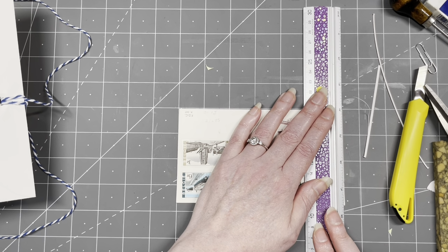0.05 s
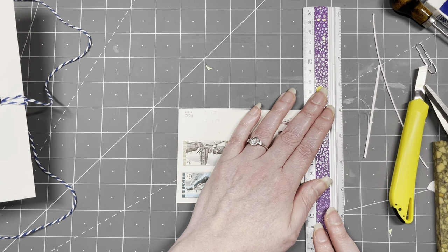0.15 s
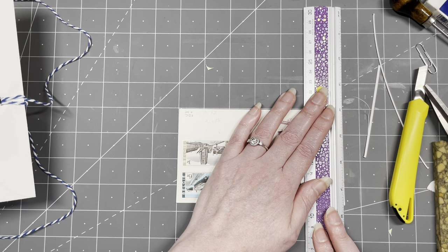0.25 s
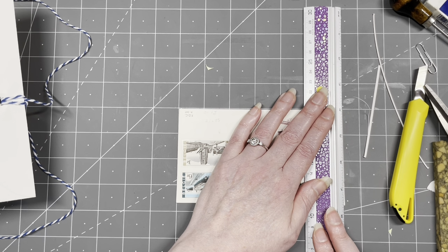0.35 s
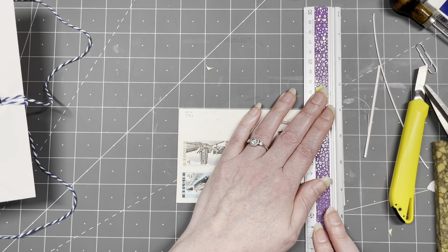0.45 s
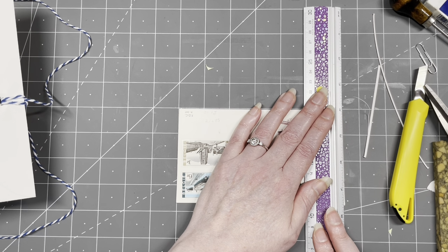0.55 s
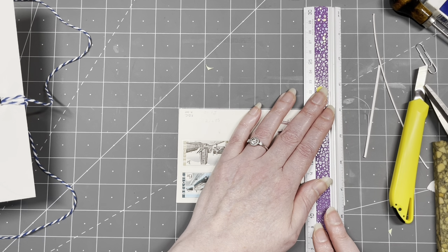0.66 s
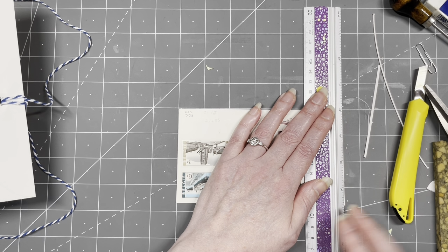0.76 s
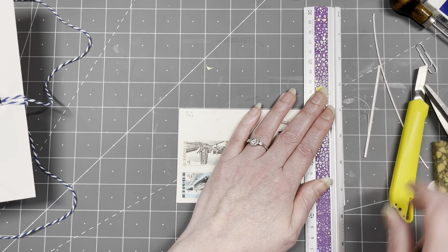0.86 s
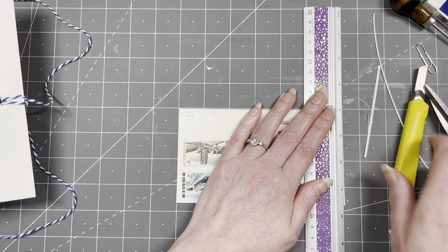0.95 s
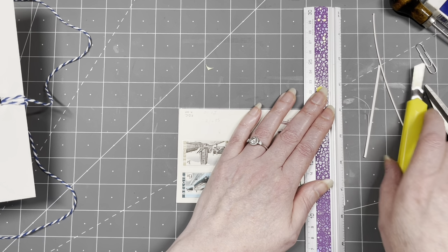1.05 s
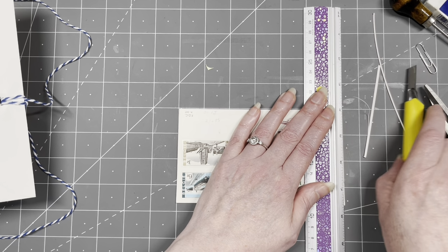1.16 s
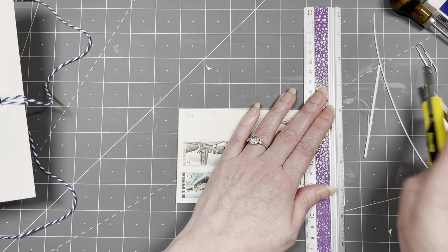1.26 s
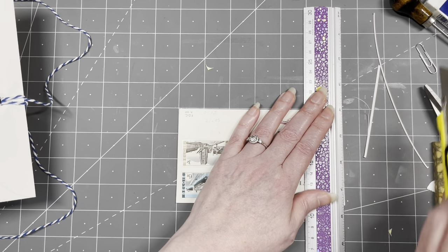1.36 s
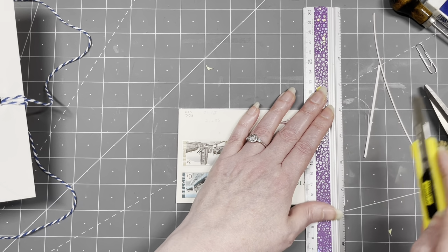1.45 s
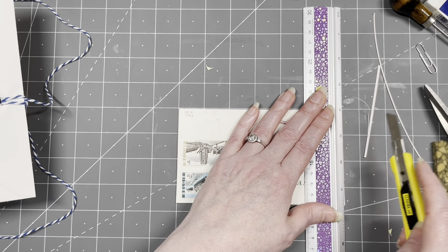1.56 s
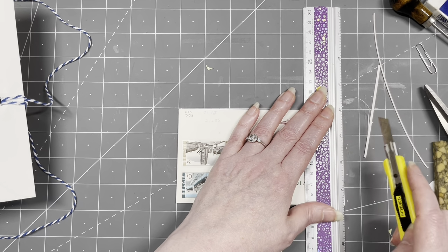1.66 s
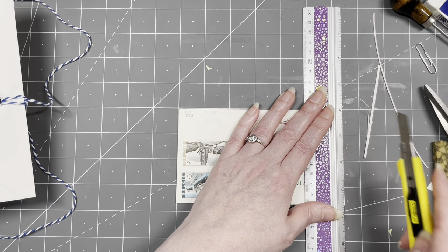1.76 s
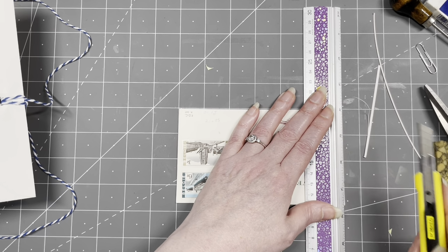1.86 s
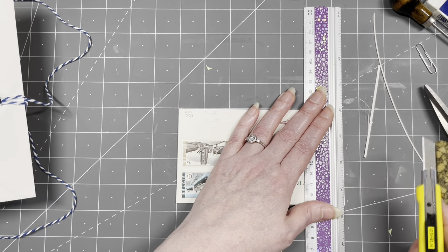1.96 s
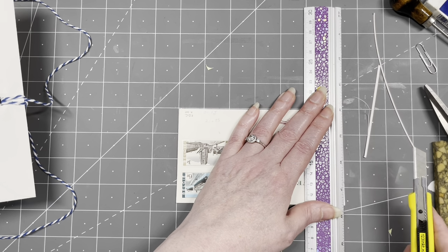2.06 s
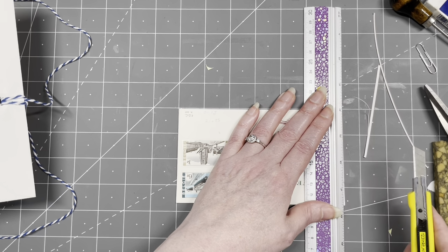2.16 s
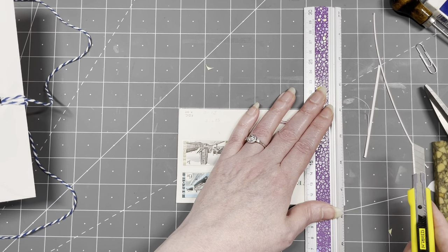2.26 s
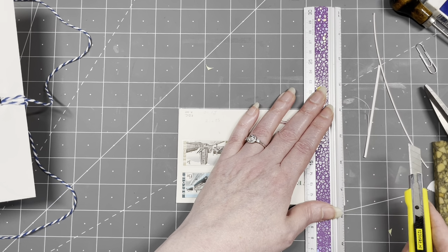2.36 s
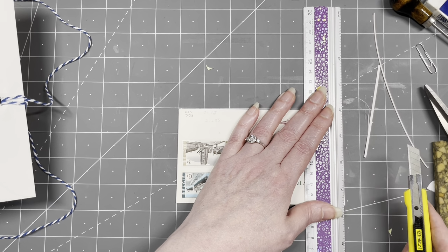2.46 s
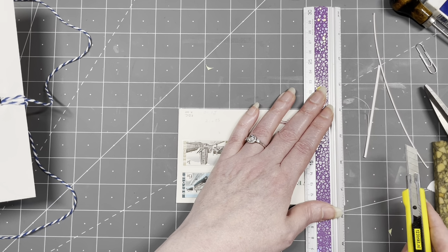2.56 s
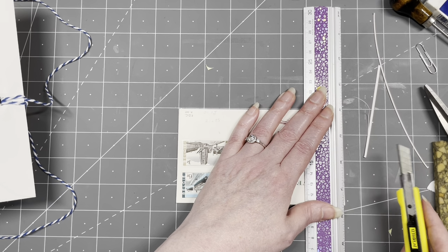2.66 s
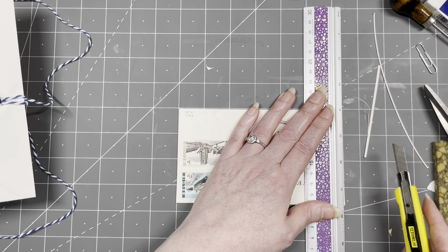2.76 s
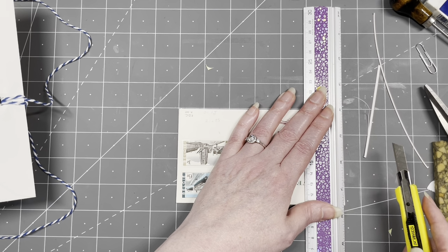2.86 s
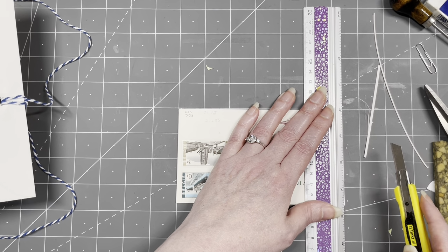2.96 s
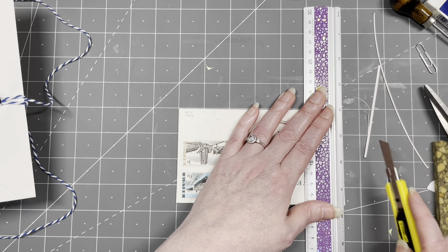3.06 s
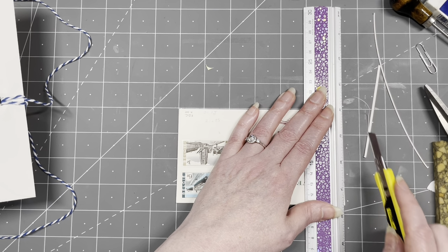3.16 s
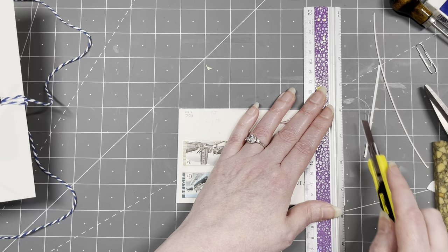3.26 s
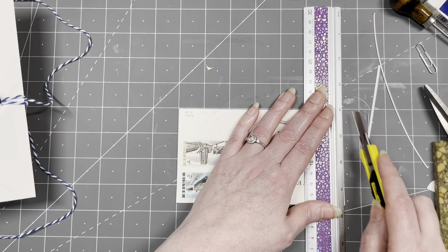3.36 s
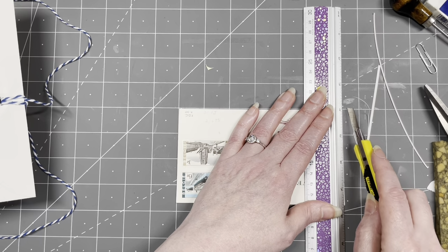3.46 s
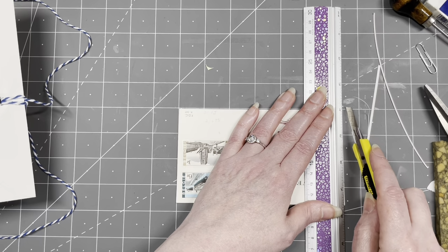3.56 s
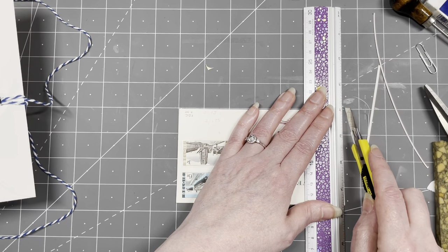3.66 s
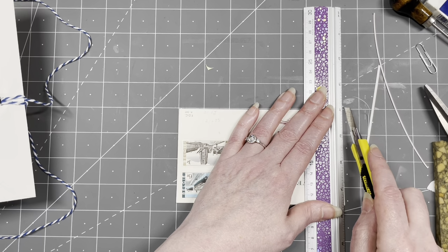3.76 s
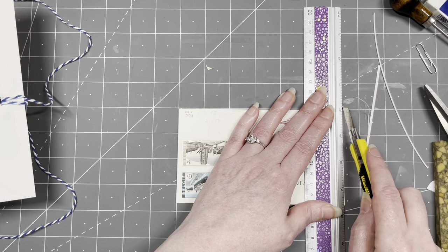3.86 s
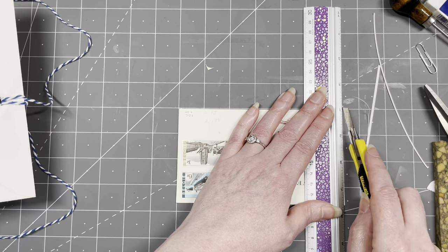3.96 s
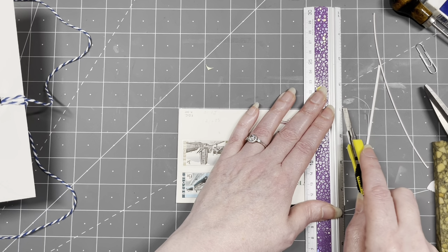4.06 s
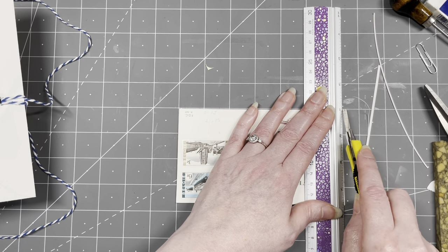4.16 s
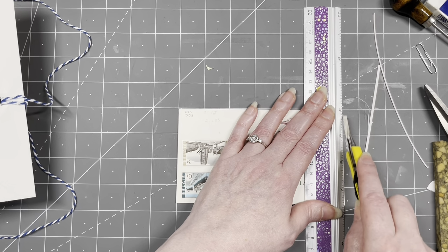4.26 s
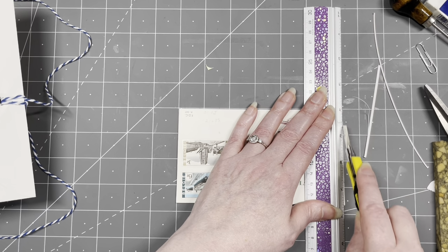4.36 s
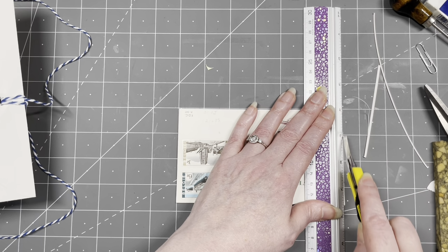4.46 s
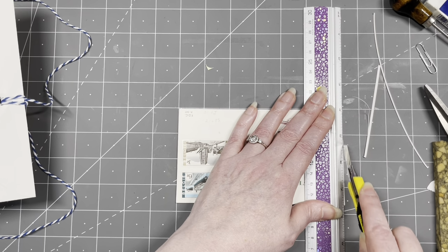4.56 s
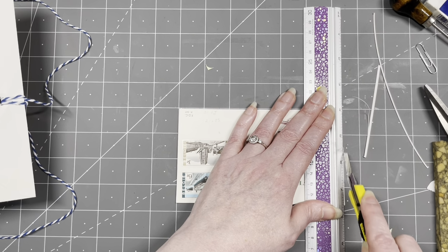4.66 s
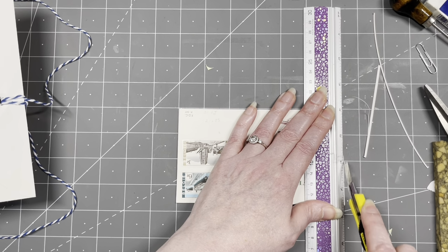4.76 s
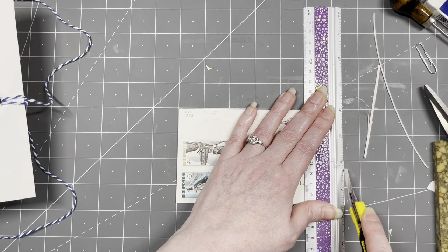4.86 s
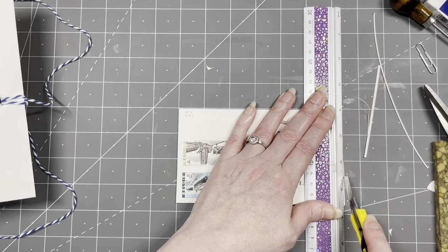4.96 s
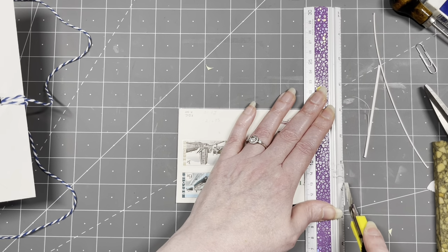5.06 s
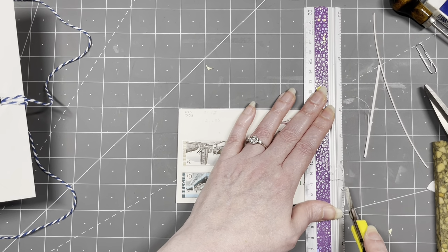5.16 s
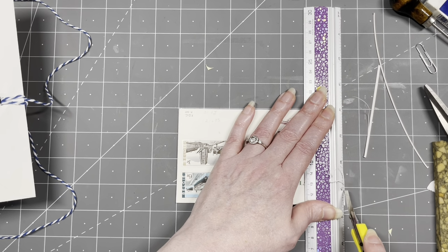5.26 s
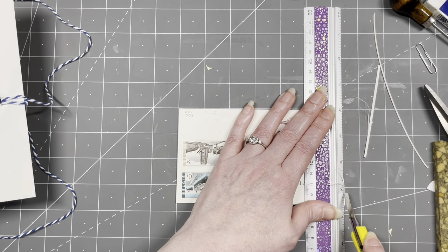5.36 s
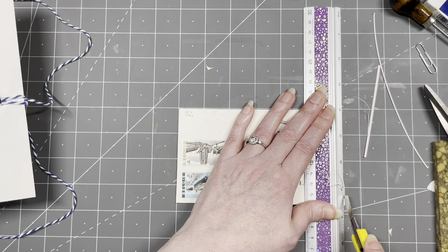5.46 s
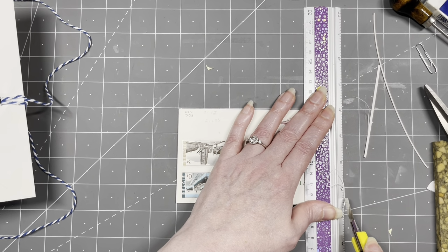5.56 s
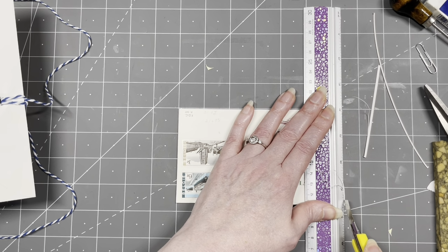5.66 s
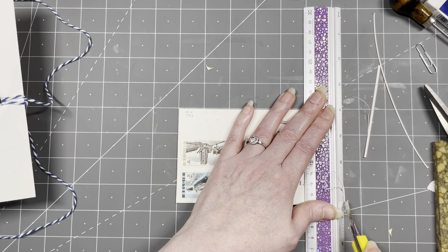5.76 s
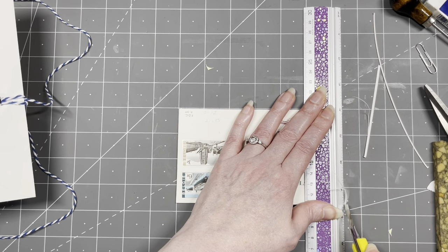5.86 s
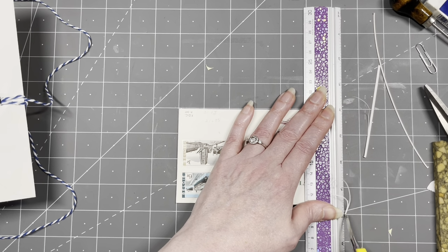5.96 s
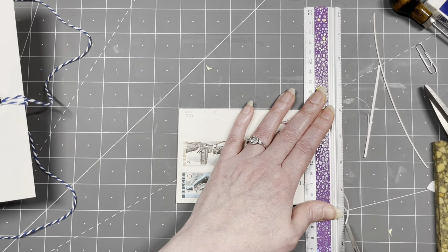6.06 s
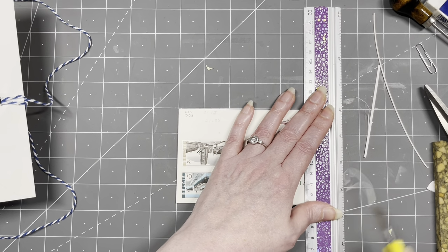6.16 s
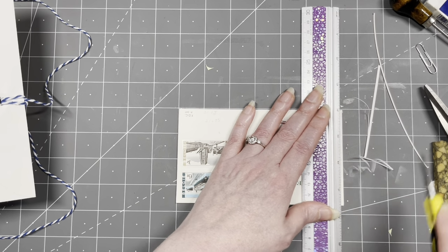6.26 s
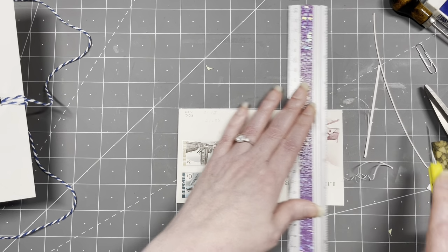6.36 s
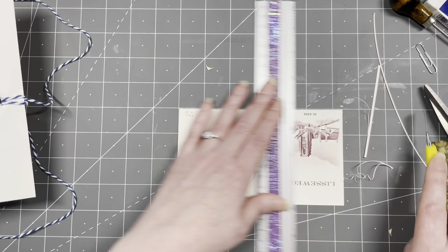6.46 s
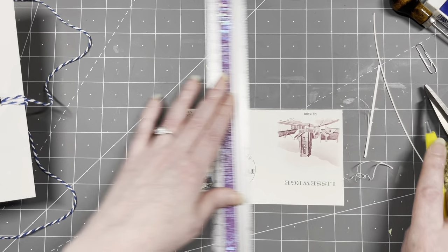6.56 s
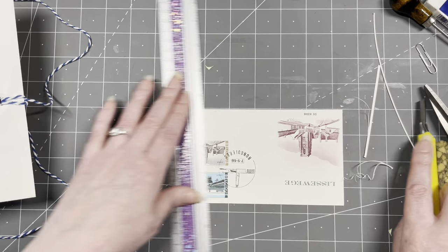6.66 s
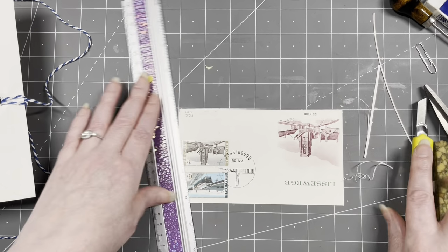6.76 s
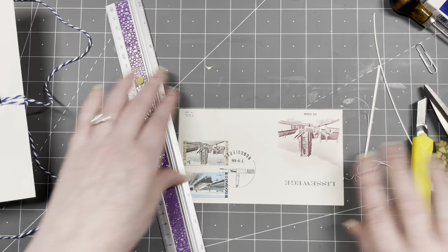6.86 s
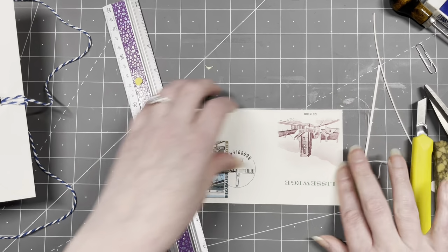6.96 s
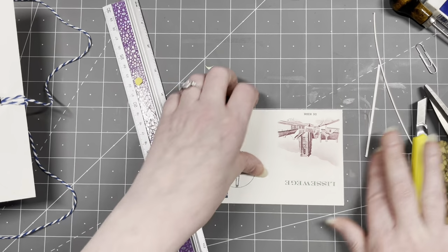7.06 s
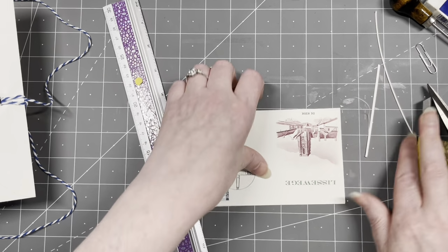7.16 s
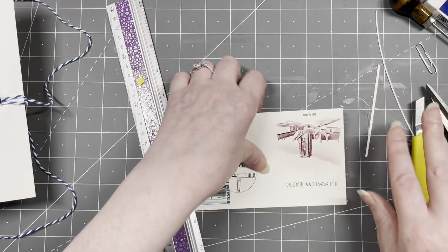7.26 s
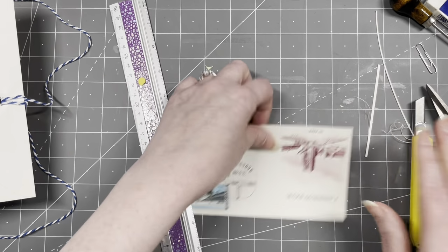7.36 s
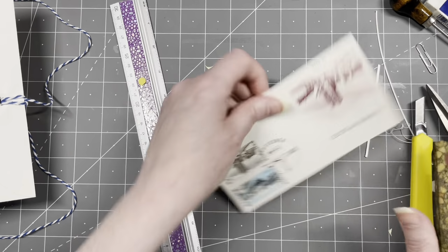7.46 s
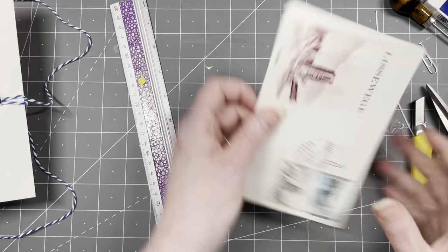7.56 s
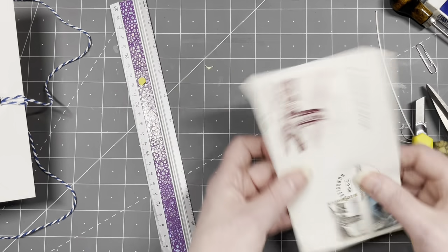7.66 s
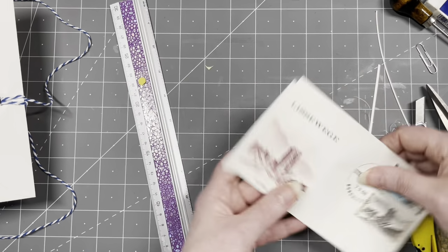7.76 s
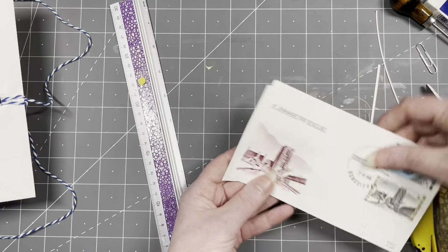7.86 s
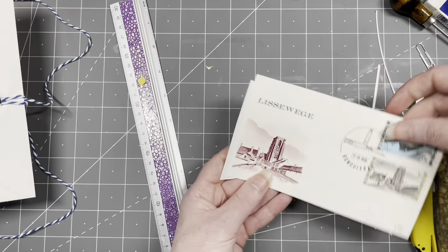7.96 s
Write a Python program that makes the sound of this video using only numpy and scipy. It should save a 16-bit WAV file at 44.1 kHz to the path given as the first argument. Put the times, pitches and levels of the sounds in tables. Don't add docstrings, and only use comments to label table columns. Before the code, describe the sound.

Close stereo pickup over a cutting mat, with quiet room rumble and faint hiss. Plastic handle clatter comes first, then skin rubs and small slider clicks. A dry, bright tearing scrape starts strong and weakens unevenly. Next a metal ruler slides quickly, bumping to one sharp hardest knock. Taps and a palm swish lead to stiff paper rubbing, bending and popping.

```python
import sys
import numpy as np
from scipy import signal
from scipy.fft import rfft, irfft, next_fast_len
from scipy.io import wavfile
from scipy.ndimage import uniform_filter1d, map_coordinates

SR = 44100
rng = np.random.default_rng(int(sys.argv[2]) if len(sys.argv) > 2 else 0)


def decibels_to_gain(level_db):
    exponent = np.asarray(level_db, float) / 20
    return 10 ** exponent


def transcribe(u):
    v = np.clip(np.atleast_2d(u).T, -1, 1)
    q = np.round(v * 32767).astype(np.int16)
    wavfile.write(sys.argv[1], SR, q)


N = 353417

# (frequency [Hz], level [dB per Hz])
HUM = [(13, -46.5), (22, -16), (54, -3), (101, -6), (195, -29), (319, -29), (444, -36), (487, -35.5),
       (743, -39.5), (1690, -47), (2090, -47), (2900, -50), (6000, -53.5), (7800, -90.5), (13200, -120)]
# (frequency [Hz], level [dB per Hz])
AIR = [(6000, -4), (8000, -1.5), (11000, -7), (13000, -8), (15500, -13)]
# (frequency [Hz], likeness [0-1])
ALIKE = [(60, .998), (170, .985), (300, .89), (700, .75), (1700, .88), (3000, .9), (5000, .82), (6500, .9),
         (7800, .96), (8200, .9995), (8600, .96), (9800, .9), (11000, .999), (12200, .999), (13200, .8),
         (14500, .999), (15500, .96)]
# (frequency [Hz], likeness [0-1])
HUM_ALIKE = [(60, .98), (300, .8), (900, .36), (1700, .33), (3500, .6), (6500, .7), (7800, .99),
             (8600, .99), (9800, .75), (11000, .98), (12200, .98), (13200, .6), (14500, .97)]
# (frequency [Hz], difference [dB])
LEFT_LOUDER = [(100, 0), (1000, 0), (2400, 3), (5000, 4), (6500, 1.5), (7800, 0)]
# (frequency [Hz], lead [half-cycles])
LEFT_LEADS = [(1500, 0), (3000, .15), (5200, .15), (5800, -.05), (7240, -.6), (7900, -.94), (8200, -1),
              (8600, -1.11), (11000, -2), (12200, -2), (14200, -2.92), (14900, -3), (15200, -3.02),
              (15500, -3.16)]
# (frequency [Hz], time to fall 60 dB [s])
ROOM = [(200, 0.16), (2000, 0.19), (10000, 0.028)]
# (lowest [Hz], highest [Hz])
LAYER_BANDS = [
    (30, 215),
    (215, 1150),
    (1150, 7000),
    (7000, 20000),
]
# (frequency [Hz], level [dB per Hz])
TREBLE = [(6000, -3), (7500, -3.5), (9300, -7.5), (11500, -11.5), (13000, -11.5), (15500, -12),
          (16000, -7.5)]

# (frequency [Hz], width [Hz], level [dB])
DESK = [(72.15, 8.7, 6.5), (107, 47, 0.5), (129.76, 13, 6.5), (183.6, 29, -8), (258.3, 23, -5.5),
        (382.6, 40, -8.5), (500, 21, -11), (573, 62, -15.5), (702, 150, -16), (1050, 520, -16.5)]
# (frequency [Hz], width [Hz], level [dB])
PAPER_DRUM = [(600, 80, -9.5), (1045, 136, 6.5)]
PAPER_DRUM_TOP_HZ = 1260
HELD_HZ, HELD_WIDTH_HZ = 132, 39
# (frequency [Hz], width [Hz], level [dB])
RULER = [(1444, 115, 7.5), (2200, 350, -6), (3350, 510, 2.5), (4510, 205, 6.5), (5170, 440, -1),
         (5850, 330, 3.5), (6280, 230, -6.5)]
# (frequency [Hz], width [Hz], level [dB])
HANDLE = [(1480, 410, -6), (2100, 220, -4), (3080, 280, 6.5), (3663, 320, 1.5), (4540, 1300, -4),
          (5610, 450, -5.5)]
# (frequency [Hz], width [Hz], level [dB])
SLIDER = [(2300, 210, -4), (2800, 380, 2), (3170, 590, -0.5), (4850, 360, -8), (5510, 150, -5)]
# (frequency [Hz], width [Hz], level [dB])
SKIN = [(2900, 700, 1), (3725, 1000, 2), (5100, 1200, -9.5), (6800, 1500, -8.5)]
# (frequency [Hz], width [Hz], level [dB])
KNIFE_ON_MAT = [(1590, 90, 4.5), (2300, 2670, -3), (3900, 1960, 2.5), (5650, 270, -4), (5700, 380, -8.5)]
# (frequency [Hz], width [Hz], level [dB])
PALM = [(1280, 580, 1), (2900, 1900, 1), (4500, 1800, 0.5), (6250, 1200, -2)]
# (frequency [Hz], width [Hz], level [dB])
ENVELOPE = [
    [(1320, 280, 8), (2060, 870, 3), (3660, 980, 0.5), (5770, 1500, -9)],
    [(1290, 140, 5), (2920, 580, 4), (3700, 380, -1), (6600, 1900, 3)],
    [(1310, 320, 12), (2060, 800, 6), (3670, 500, 1), (5740, 1500, -16)],
    [(1200, 500, 6.5), (2000, 500, 4), (3570, 440, 2.5), (5930, 1900, -14)],
]
ENVELOPE_AT = (7.55, 7.73, 7.8, 7.92)
# (frequency [Hz], width [Hz], level [dB])
SLIDING_RULER = [
    [(1150, 500, -11), (1520, 140, -5), (1970, 300, -5), (3260, 260, 5), (4200, 400, -4), (5400, 1000, -7),
     (6700, 900, -7)],
    [(1150, 500, -9), (1460, 200, -6), (2300, 600, -6), (3340, 280, 6), (4270, 400, -3), (5200, 700, -4),
     (6210, 700, -5)],
    [(1150, 500, -9), (1490, 200, -5), (2000, 350, -2), (3300, 230, 6), (4350, 400, -3), (5050, 500, -2),
     (6380, 900, -4)],
]
SLIDING_AT = (6.3, 6.47, 6.63)
# (frequency [Hz], width [Hz], level [dB])
BLADE = [
    [(1400, 300, 6), (2040, 3300, 3), (3070, 380, 1.5), (4160, 280, 4.5), (5670, 800, -1), (7070, 780, 9.5),
     (8840, 240, 9.5), (10260, 180, -18), (13900, 1900, -12)],
    [(1400, 230, 5), (2040, 310, 6), (3050, 910, -5.5), (3800, 800, -2), (4930, 500, -5), (7940, 194, 14.5),
     (9170, 670, 11), (10300, 600, -9), (14080, 3600, 1.5)],
    [(2123, 240, 7.5), (3430, 850, -3), (4110, 100, -1.5), (5870, 890, -8), (6700, 220, -3.5),
     (7650, 360, 1.5), (8750, 980, -2), (14600, 4100, -16.5)],
    [(1974, 140, 13.5), (3280, 310, 2), (4220, 360, 8), (5800, 900, 0.5), (6700, 310, -2), (8000, 150, -8),
     (10000, 550, -3.5), (14500, 3600, 0.5)],
    [(2000, 500, 6), (3000, 900, 2.5), (4400, 900, 3.5), (5800, 1200, -1.5), (6900, 600, 1),
     (9900, 1700, -3), (14000, 3300, -2)],
]
BLADE_AT = (4.4, 4.8, 5.3, 5.8, 6.1)

# (time [s], length [s], strength [dB], dryness [dB])
BRUSHES = [
    (0.705, .01, -78, 6),
    (1.09, 0.048, -74, -3),
    (1.285, 0.035, -75, -0.5),
    (1.381, 0.067, -67.5, 2),
    (1.422, 0.048, -66.5, -3),
    (2.694, 0.019, -74, -9),
    (2.986, 0.032, -82, -1),
    (3, 0.3, -94.5, 12),
    (3.99, 0.15, -93, 9),
]
TOUCH_DB_PER_S, LEAVE_DB_PER_S, SKIN_MAT_DB = 400, 400.5, -13
# (time [s], speed [dB], pressure [dB])
CUT = [(4.14, -84, -74), (4.22, -57, -55.5), (4.27, -51, -46), (4.43, -50.5, -46.5), (4.9, -54, -46.5),
       (5.25, -60.5, -49.5), (5.7, -65.5, -52.5), (5.87, -60, -47.5), (5.96, -65, -60.5),
       (6.06, -67.5, -66), (6.08, -67.5, -70)]
# (time [s], speed [dB], pressure [dB])
SLIDE = [
    (6.18, -83, -55),
    (6.27, -59, -69),
    (6.39, -50, -67),
    (6.44, -40.5, -47.5),
    (6.52, -41.5, -48),
    (6.64, -37, -49),
    (6.715, -37.5, -38),
    (6.79, -61.5, -34),
    (6.81, -58.5, -41),
]
# (time [s], speed [dB], pressure [dB])
REACH = [(6.955, -67.5, -60), (7.02, -69, -72), (7.12, -65, -49), (7.145, -56, -39.5), (7.177, -61.5, -40),
         (7.2, -58.5, -47.5), (7.275, -61, -43), (7.33, -53.5, -64), (7.36, -56, -62), (7.375, -50.5, -67),
         (7.41, -47.5, -57)]
# (time [s], speed [dB], pressure [dB])
LIFT = [
    (7.45, -64, -40),
    (7.475, -64.5, -56),
    (7.57, -61, -57.5),
    (7.7, -59, -47),
    (7.72, -46, -65),
    (7.75, -49.5, -60),
    (7.765, -57.5, -58.5),
    (7.83, -57, -56.5),
    (7.85, -64, -65),
]
# (mat [dB], pressure's share in mat [1 = all], hiss [dB], hiss growth with speed, release
# [dB/s])
BLADE_LAW = (-10, 1.0956, -3.5, 1.34, 56)
RULER_LAW = (-8.5, 0.52, -5, 0.72, 277.5)
HAND_LAW = (-7, 0.73, 2.5, .8, 600)
ENVELOPE_LAW = (-7.5, 0.73, -3, 0.78, 19.5)
USUAL_DB = -50
# (time [s], depth [dB], half-width [s])
SNAGS = [(4.61, 5.5, 0.072), (5.308, 5, 0.021), (5.44, 9, 0.0059), (5.598, 5.5, 0.038), (5.788, 10.5, 0.04),
         (4.236, -5.5, 0.004), (4.967, -5, 0.015), (5.196, -3, 0.0039), (5.268, 5, 0.0067),
         (5.352, -3.5, 0.0039), (5.373, -5, .005), (5.464, -2, 0.0066), (5.632, -5, 0.0054),
         (5.655, -5.5, 0.0062), (5.705, -3, 0.0034), (5.822, -5.5, 0.0069), (5.849, -6.5, .005),
         (5.868, -0.5, .005), (5.889, -6.5, 0.0047), (5.912, -5.5, 0.0035)]
SNAG_EASES = 0.86

# (time [s], peak [dB], then above peak: desk [dB], mat [dB], treble [dB])
PICKUP = [(0.6975, -55.5, 5, -0.5, -32), (0.9938, -71, 24, 14, -37), (1.036, -53.5, 15.5, -0.5, -14.5),
          (1.0517, -34.5, 0, -10.5, -6.5), (1.0712, -35.5, 0.5, -6, -17), (1.074, -42, 11, 11.5, -4.5),
          (1.1565, -56, 17.5, 0.5, -16), (1.164, -50, -5.5, -2.5, -5.5), (1.1674, -27, -11.5, -3, -18.5),
          (1.184, -42.5, -22.5, -2, -11.5), (1.1986, -33, -6.5, -17.5, -5.5),
          (1.2088, -29.5, -20, -4, -17.5), (1.2184, -24.5, -8.5, -13.5, -14),
          (1.2228, -43.5, 3.5, -12, -26.5)]
# (time [s], peak [dB], then above peak: desk [dB], mat [dB], treble
# [dB])
CLICKS = [(1.7124, -60.5, -7, -15, -12), (2.6905, -42, -29.5, -41, -35), (2.7174, -58, -19, -26, -34),
          (2.9577, -89, 8, -4, -12), (2.9878, -45.5, -12, -47, -20.5), (3.029, -73, 19, -12, -22),
          (3.912, -71, 20, 7, -19), (4.092, -74, -9, -24, 6), (4.1638, -56.5, -18, -9, -6),
          (6.1052, -57.5, -1, -47, -6), (6.1456, -48.5, -16, -9, -12.5), (6.2197, -58.5, 8, -13, -12)]
# (time [s], peak [dB], then above peak: desk [dB], mat [dB], treble [dB])
BUMPS = [
    (6.4738, -37.5, -11, -23, -9),
    (6.5363, -30, -22, -29, -22.5),
    (6.5835, -24.5, -16.5, -6, -7.5),
    (6.6311, -37.5, -16, -5, -25.5),
    (6.6645, -21, -12.5, -11.5, -19),
    (6.7224, -33.5, 16.5, 13, -24),
    (6.7287, -11, -4, -14, -8),
    (6.7455, -14, -18, -7, -9),
    (6.7697, -33, -9.5, -25, -3),
]
# (time [s], peak [dB], then above peak: desk [dB], mat [dB], treble [dB])
TAPS = [(6.9487, -57.5, 27, -36, 3), (7.0495, -51.5, 21, 19.5, -27.5), (7.0725, -47.5, -6, 8, -8.5),
        (7.1318, -31, -12, -8.5, 3.5), (7.1652, -41.5, -8, -3, -13.5), (7.203, -29.5, 6.5, 3.5, -6.5),
        (7.219, -46.5, 0, 15, -21.5), (7.2566, -42.5, -20, 8, -19.5), (7.2623, -38, -1, -6, -11),
        (7.342, -41.5, -35, -17, -17), (7.4166, -20, -25, -7, -10), (7.4333, -30.5, -22, -1.5, -23.5),
        (7.662, -29, -39, -3, -23.5), (7.671, -41.5, -34, -23, -21)]
# (time [s], peak [dB], pitch [Hz], treble [dB], time to fall 60 dB [s])
FLAPS = [
    (7.486, -38, 1050, -25, 0.016),
    (7.62, -35.5, 1040, -31, 0.0066),
    (7.641, -25, 1050, -21, 0.0043),
    (7.668, -20.5, 905, -12, 0.037),
    (7.6777, -17.5, 1070, -23.5, 0.0037),
    (7.7695, -25, 1050, -30.5, 0.013),
    (7.876, -29, 1060, -26, 0.031),
    (7.883, -29, 1050, -34.5, 0.009),
]
# (time [s], peak [dB], centre [Hz], width [Hz], time to fall 60
# dB [s])
TICKS = [(0.993, -60, 2100, 700, .02), (1.112, -55, 5500, 3500, .01), (1.135, -57, 3300, 900, 0.035),
         (1.222, -34, 5500, 2500, 0.014), (1.239, -61, 3240, 1200, 0.022),
         (1.426, -55.5, 5000, 4000, 0.0099), (2.657, -70, 2300, 250, .12), (2.705, -58, 2400, 600, .03),
         (2.96, -70, 4200, 700, .06), (3.023, -68, 2970, 400, .08), (3.079, -67, 2800, 3000, .01),
         (3.995, -64, 5000, 2500, 0.0089), (4.004, -66.5, 10500, 3000, .02),
         (6.723, -27, 2200, 1500, 0.0081), (6.7405, -16, 5500, 4500, .02), (6.808, -49, 890, 903, 0.015),
         (7.156, -39, 4200, 500, .02), (7.278, -44, 3200, 3000, .02), (7.4345, -43, 6220, 200, 0.036),
         (7.454, -44, 4200, 1200, .015), (7.619, -55, 4200, 2000, .012),
         (7.6585, -28.5, 2000, 3000, 0.0087), (7.692, -42, 5500, 3000, .015),
         (7.738, -40, 1400, 350, 0.0086), (2.712, -65, 4800, 2500, .05), (6.431, -40, 500, 600, 0.056),
         (6.481, -33.5, 72.4, 25, 0.069), (6.539, -33.5, 283, 200, 0.043), (6.585, -31, 330, 350, 0.015),
         (6.67, -35, 330, 250, .04), (7.095, -44.5, 1200, 1500, 0.13), (7.165, -40, 3900, 700, .015),
         (7.226, -51, 4130, 600, 0.016), (7.42, -38, 5100, 200, 0.042), (7.51, -50, 1600, 900, .06),
         (7.582, -46, 2200, 900, .03), (7.677, -24.5, 2600, 1500, 0.0088)]
RING_S, RING_HZ = 6.745, 1960
RING_DB, RING_T60 = -49.5, 0.26


def unit(x):
    return x / np.sqrt(np.mean(x ** 2) + 1e-30)


def top(x):
    return x / np.abs(x).max()


def along(points, hz):
    f, v = np.transpose(points)
    return np.interp(np.log(hz + 1), np.log(f + 1), v)


def filtered(x, response):
    m = next_fast_len(x.shape[-1] + 8192)
    spectrum = rfft(x, m) * response(np.fft.rfftfreq(m, 1 / SR))
    return irfft(spectrum, m)[..., :x.shape[-1]]


def ringing(modes, sign=-1):
    def response(f):
        total = 0
        for k, (centre, width, db) in enumerate(modes):
            resonance = 1j * f * width / (centre * centre - f * f + 1j * f * width)
            total = total + sign ** k * decibels_to_gain(db) * resonance
        return total
    return response


def band(hz, lo, hi):
    low_pass = lambda u: 1 / (1 - u * u + 1j * np.sqrt(2) * u) ** 2
    return low_pass(hz / hi) * low_pass(-lo / (hz + 1e-9))


def spread(pair, alike):
    def shares(hz):
        turn = np.arccos(np.clip(along(alike, hz), -1, 1)) / 2
        return np.array([np.cos(turn), np.sin(turn)])
    mid, side = filtered(pair, shares)
    return np.array([mid + side, mid - side])


def wobble(n, rate):
    return map_coordinates(rng.standard_normal(n // 50 + 4), [np.arange(n) * rate / SR])


def add(out, s, sound):
    start = round(s * SR)
    part = out[:, start:start + sound.shape[1]]
    part += sound[:, :part.shape[1]]


def room_tone():
    hum = unit(filtered(rng.standard_normal((2, N)), lambda hz: decibels_to_gain(along(HUM, hz))))
    air = unit(filtered(rng.standard_normal((2, N)), lambda hz: decibels_to_gain(along(AIR, hz)) * (hz > 6000)))
    swell_db = 0.41 * wobble(N, rate=3.1)
    return spread(decibels_to_gain(-60 + swell_db) * hum + decibels_to_gain(-90.0) * air, HUM_ALIKE)


def walls(x):
    hz, t, z = signal.stft(rng.standard_normal((2, SR // 2)), SR, nperseg=256)
    fade = decibels_to_gain(-60 * t / along(ROOM, hz)[:, None])
    tail = signal.istft(z * fade, SR, nperseg=256)[1]
    late = np.pad(x, ((0, 0), (300, 0)))
    return signal.fftconvolve(late, tail / np.linalg.norm(tail[0]), axes=1)[:, :N]


def layers(force, body, blade=False, sign=-1, held_db=0):
    def response(hz):
        desk, own = ringing(DESK)(hz), ringing(body, sign)(hz)
        held = desk * decibels_to_gain(held_db * np.exp(-((hz - HELD_HZ) / HELD_WIDTH_HZ) ** 2))
        mat, treble = desk, decibels_to_gain(along(TREBLE, hz))
        if blade:
            own = own * band(hz, 1550, SR)
            mat = desk * (1 + ringing(PAPER_DRUM)(hz)) * band(hz, 1, PAPER_DRUM_TOP_HZ)
            treble = own
        colours = held, mat, own, treble
        return np.array([[colour * band(hz, *edges)] for colour, edges in zip(colours, LAYER_BANDS)])
    return np.array([unit(part) for part in filtered(force, response)])


def burst(t60, n, attack, push=0):
    t = np.arange(n) / SR
    t60 = max(t60, .004)
    blow = decibels_to_gain(-60 * t / t60)
    chatter = decibels_to_gain(-19.0 - 60 * t / (4.5 * t60))
    shape = (blow + chatter) * (1 - np.exp(-t / abs(attack)))
    return shape * (rng.standard_normal((2, n)) + [[push], [0]])


def ticks():
    out = np.zeros((2, N))
    for s, db, hz, width_hz, t60 in TICKS:
        note = ringing([(hz, width_hz, 0)])
        blow = burst(t60, SR // 5, attack=.0005)
        add(out, s, decibels_to_gain(db) * top(filtered(blow, lambda f: note(f) ** 2)))
    return out


def ring():
    out, t = np.zeros((2, N)), np.arange(SR // 4) / SR
    note = decibels_to_gain(RING_DB - 60 * t / RING_T60) * np.sin(2 * np.pi * RING_HZ * t)
    add(out, RING_S, note * np.array([[1], [0]]))
    return out


def flaps():
    out = np.zeros((2, N))
    for s, db, hz, treble_db, t60 in FLAPS:
        force = burst(t60, SR // 10, attack=0.00034, push=0.98)
        hollow = ringing([(0.1 * hz, 250, -9), (hz, 260, 0), (1.4 * hz, 260, -5), (1.92 * hz, 400, -8)])
        note = filtered(force, lambda f: hollow(f) * band(f, 355, 2200))
        puff = filtered(force, lambda f: band(f, 3600, 13000))
        add(out, s, decibels_to_gain(db - 1.0) * (top(note) + decibels_to_gain(treble_db) * top(puff)))
    return out


def contacts(rows, body, t60, shortens, held_db=0):
    out = np.zeros((2, N))
    for s, db, desk_db, mat_db, treble_db in rows:
        modes = np.array(body) + [0, 0, 2.2] * rng.standard_normal((len(body), 3))
        tap_t60 = t60 * decibels_to_gain(shortens * (USUAL_DB - db))
        force = burst(tap_t60, SR // 6, attack=0.00041, push=0.47)
        parts = layers(force, modes, held_db=held_db)
        above_db = desk_db, mat_db, 3, treble_db + 12.5
        add(out, s, sum(decibels_to_gain(db + rel) * top(part) for rel, part in zip(above_db, parts)))
    return out


def knife_handling():
    on_mat = contacts(PICKUP[:6], KNIFE_ON_MAT, t60=.03, shortens=.25)
    in_hand = contacts(PICKUP[6:], HANDLE, t60=0.053, shortens=0.3)
    return on_mat + in_hand + contacts(CLICKS, SLIDER, t60=0.0092, shortens=0.31)


def knocks():
    bumps = contacts(BUMPS, RULER, t60=0.019, shortens=0.023)
    return bumps + contacts(TAPS, KNIFE_ON_MAT, t60=0.024, shortens=0.015, held_db=-1)


def dappled(force, depth):
    hz, _, z = signal.stft(force, SR, nperseg=512)
    field = uniform_filter1d(rng.standard_normal(z.shape[1:]), size=4, axis=0)
    field = uniform_filter1d(field, size=40, axis=1)
    gain = 1 + depth * np.clip(hz / 2500, 0, 1)[:, None] * unit(field)
    return signal.istft(z * gain, nperseg=512)[1][:, :force.shape[1]]


def rub(span, levels, stir, grain_db, slip_db):
    out = np.zeros((2, N))
    n = round((span[1] - span[0]) * SR)
    t, fade = span[0] + np.arange(n) / SR, signal.windows.tukey(n, 800 / n)
    size_db = grain_db * wobble(n, rate=810) + slip_db * wobble(n, rate=53)
    force = dappled(decibels_to_gain(size_db) * rng.standard_normal((2, n)), depth=0.29)
    parts = stir(force, t)
    add(out, span[0], fade * sum(decibels_to_gain(db) * part for db, part in zip(levels(t)[::-1], parts[::-1])))
    return out


def still(body):
    return lambda force, t: layers(force, body, held_db=-3)


def travelling(bodies, times, **how):
    def stir(force, t):
        shares = [np.interp(t, times, peak) for peak in np.eye(len(bodies))]
        return sum(np.sqrt(share) * layers(force, modes, **how) for share, modes in zip(shares, bodies))
    return stir


def stroke(rows, law, snags=()):
    s, speed, pressure = np.transpose(rows)
    mat_db, share, hiss_db, grows, release = law

    def levels(t):
        dip_db = sum(db * np.exp(-((t - at) / width) ** 2) for at, db, width in snags)
        gone_db = release * np.maximum(t - s[-1], 0)
        fast = np.interp(t, s, speed) - dip_db - gone_db
        hard = np.interp(t, s, pressure) - SNAG_EASES * dip_db - gone_db
        mat = mat_db + share * hard + (1 - share) * fast
        hiss = hiss_db + USUAL_DB + grows * (fast - USUAL_DB)
        return hard, mat, fast, hiss
    return levels


def brushes(t):
    s, length, db, dry_db = np.transpose(BRUSHES)[:, :, None]
    before, after = np.maximum(s - t, 0), np.maximum(t - s - length, 0)
    level = db - TOUCH_DB_PER_S * before - LEAVE_DB_PER_S * after
    strongest = level.max(axis=0)
    return SKIN_MAT_DB + strongest, strongest, (level + dry_db).max(axis=0)


def fingers_on_knife():
    return rub((.6, 4.3), brushes, still(SKIN), grain_db=1.5, slip_db=1)


def hand_over_mat():
    return rub((6.95, 7.46), stroke(REACH, HAND_LAW), still(PALM), grain_db=2, slip_db=.8)


def envelope_in_hand():
    stir = travelling(ENVELOPE, ENVELOPE_AT, held_db=-6)
    return rub((7.44, 8.03), stroke(LIFT, ENVELOPE_LAW), stir, grain_db=2.5, slip_db=1.2)


def ruler_slide():
    stir = travelling(SLIDING_RULER, SLIDING_AT, sign=1, held_db=-10)
    return rub((6.17, 6.94), stroke(SLIDE, RULER_LAW), stir, grain_db=2.3, slip_db=1)


def blade_cut():
    stir = travelling(BLADE, BLADE_AT, blade=True, sign=1)
    return rub((4.1, 6.25), stroke(CUT, BLADE_LAW, SNAGS), stir, grain_db=2.3, slip_db=1.6)


def scene():
    taps = knife_handling() + knocks()
    rubbing = fingers_on_knife() + blade_cut() + ruler_slide() + hand_over_mat() + envelope_in_hand()
    near = rubbing + taps + ring() + flaps() + ticks()
    return spread(near + decibels_to_gain(-23.0) * walls(near), ALIKE) + room_tone()


def top_cut(x):
    return signal.sosfilt(signal.butter(12, 16490, fs=SR, output="sos"), x)


def record(dry):
    def stereo_turn(hz):
        louder = np.log(decibels_to_gain(along(LEFT_LOUDER, hz)))
        ahead = 1j * np.pi * along(LEFT_LEADS, hz)
        return np.exp(np.outer([.5, -.5], louder + ahead)) * (hz < 16000)
    return top_cut(filtered(dry, stereo_turn))


dry = scene()
out = record(dry)
transcribe(out)
```